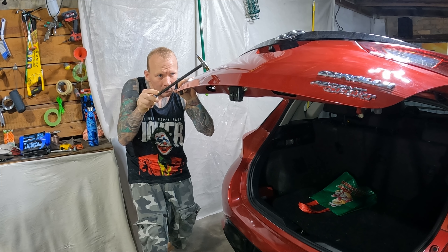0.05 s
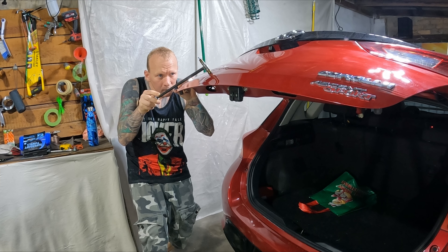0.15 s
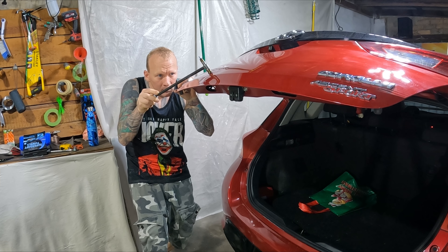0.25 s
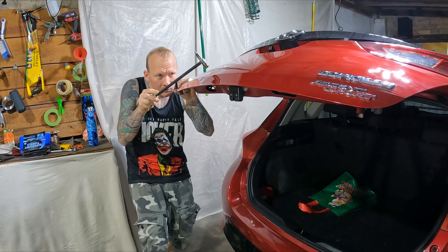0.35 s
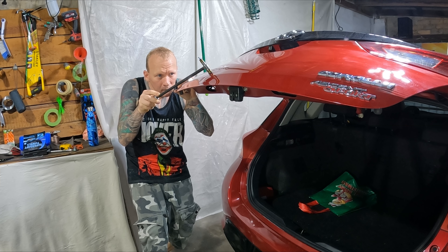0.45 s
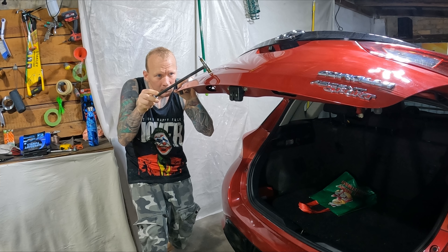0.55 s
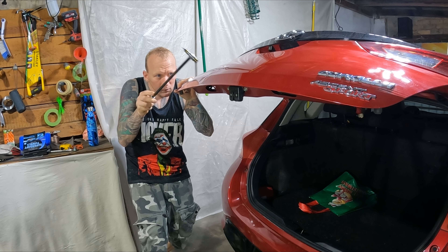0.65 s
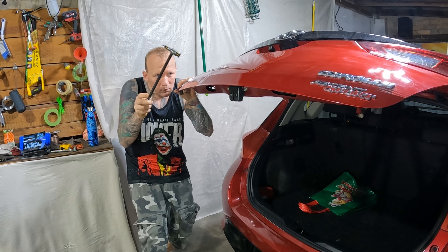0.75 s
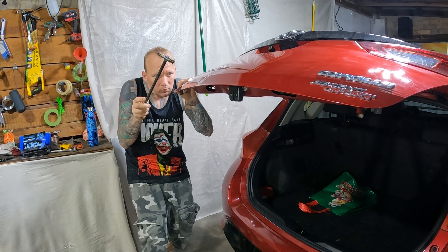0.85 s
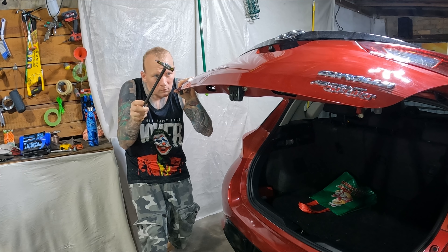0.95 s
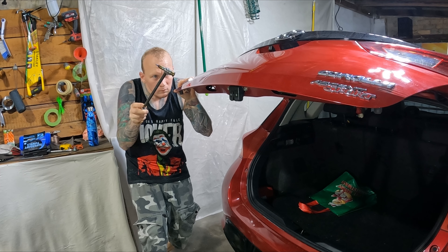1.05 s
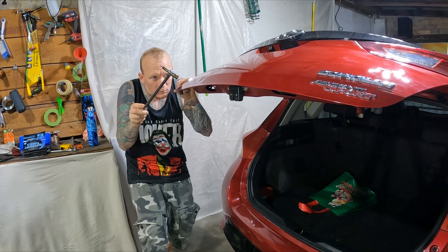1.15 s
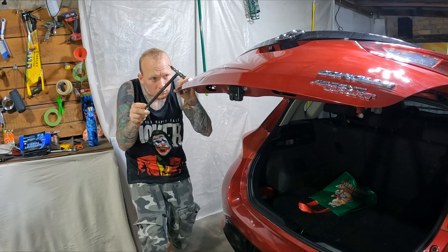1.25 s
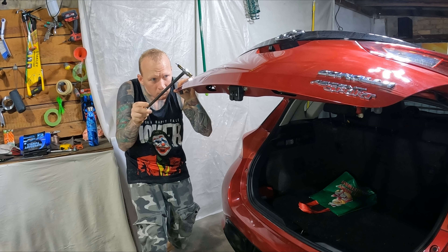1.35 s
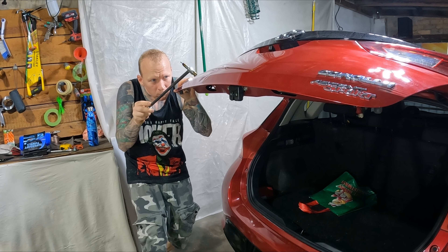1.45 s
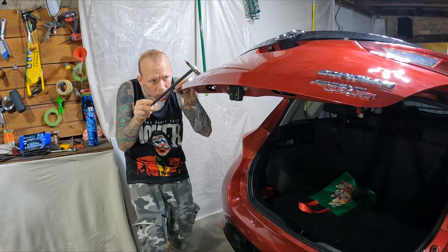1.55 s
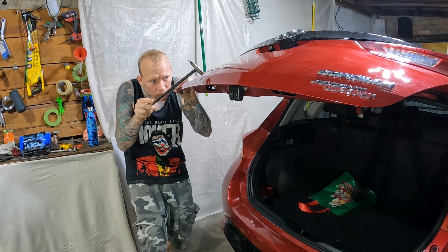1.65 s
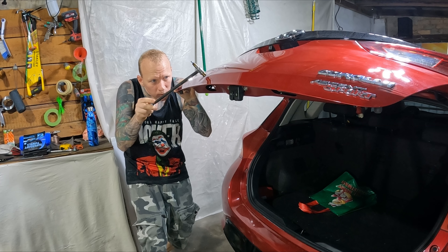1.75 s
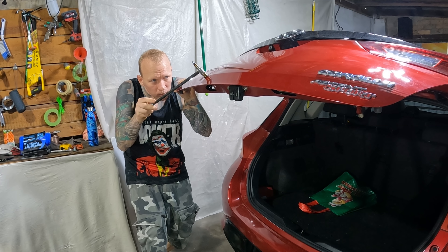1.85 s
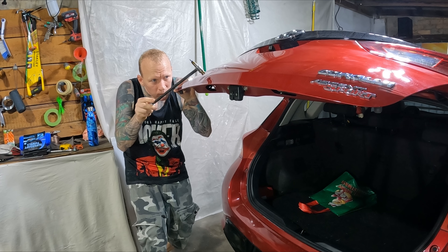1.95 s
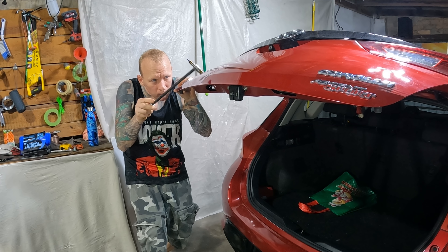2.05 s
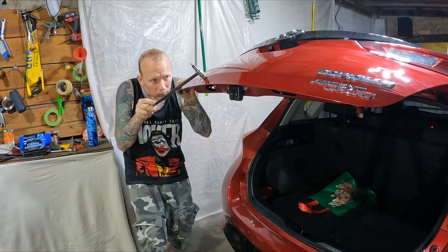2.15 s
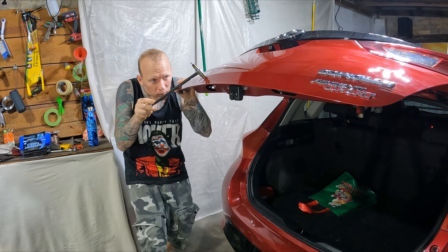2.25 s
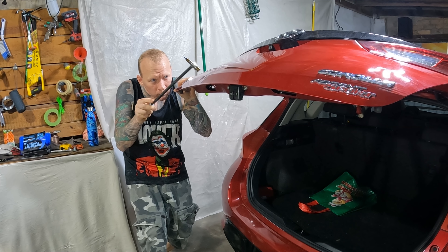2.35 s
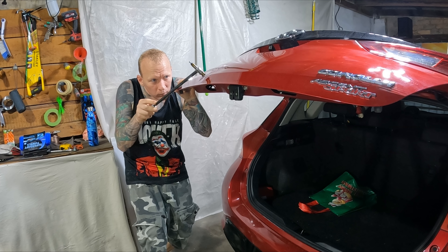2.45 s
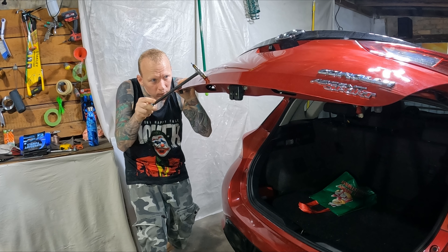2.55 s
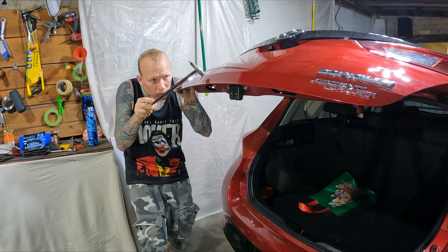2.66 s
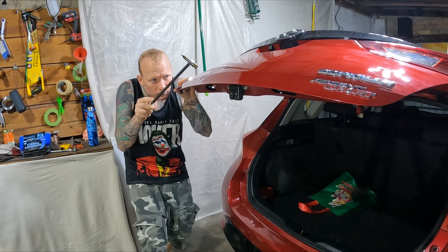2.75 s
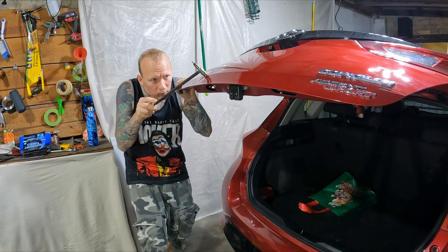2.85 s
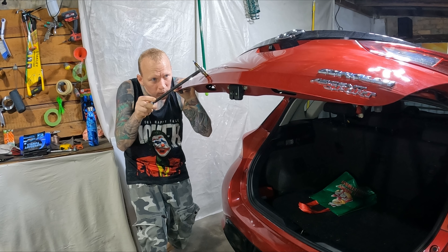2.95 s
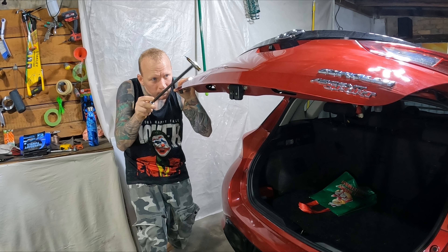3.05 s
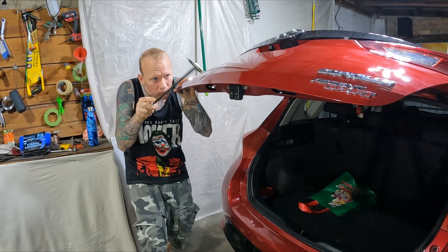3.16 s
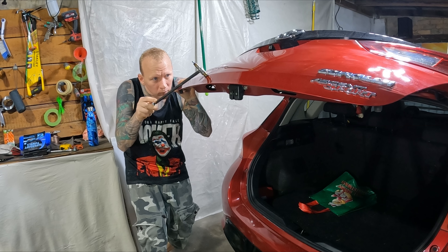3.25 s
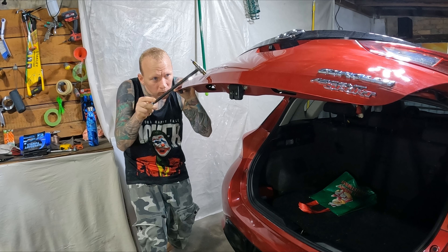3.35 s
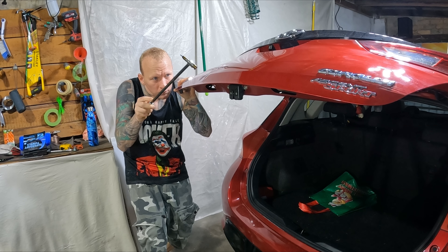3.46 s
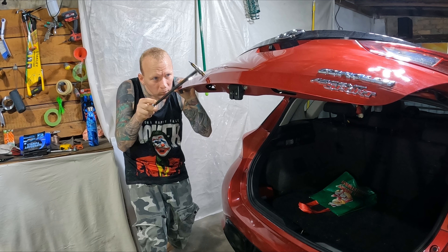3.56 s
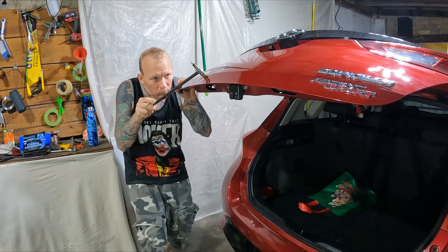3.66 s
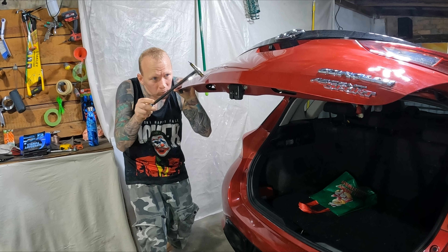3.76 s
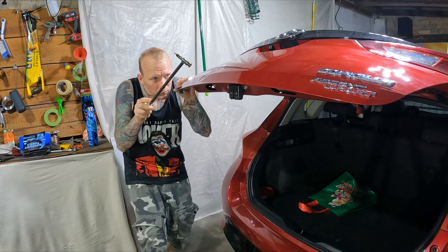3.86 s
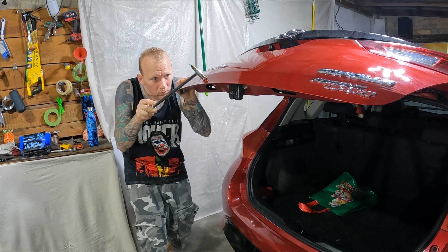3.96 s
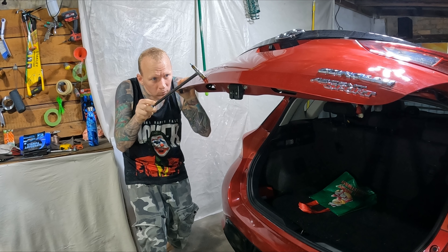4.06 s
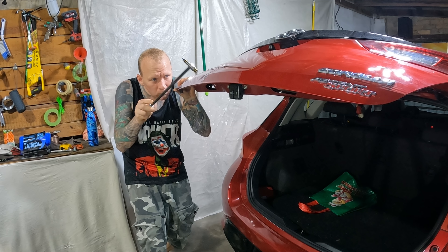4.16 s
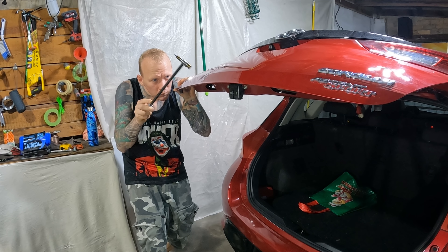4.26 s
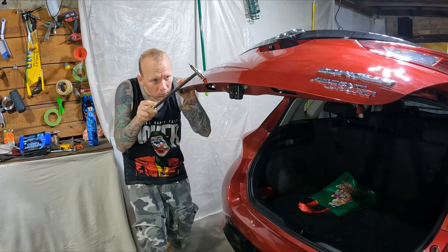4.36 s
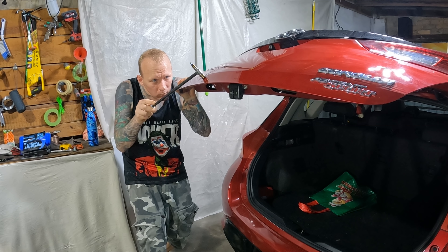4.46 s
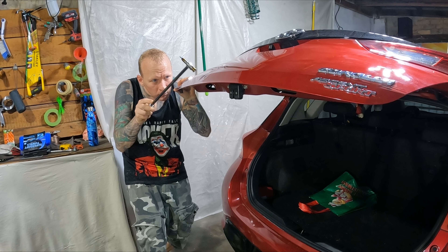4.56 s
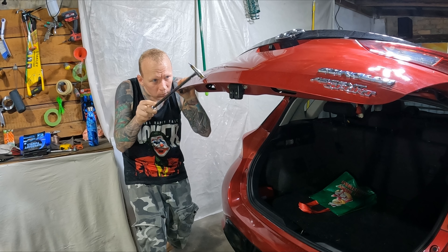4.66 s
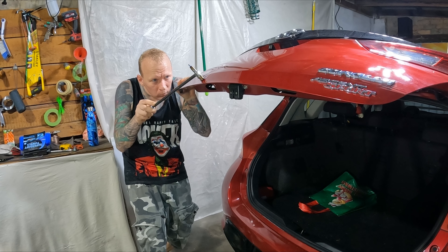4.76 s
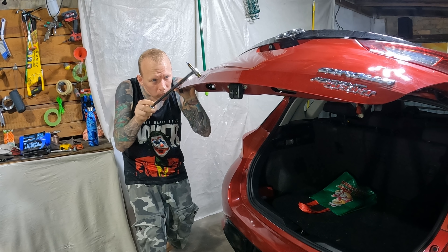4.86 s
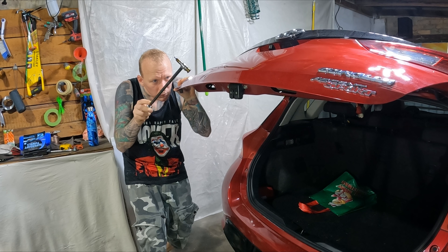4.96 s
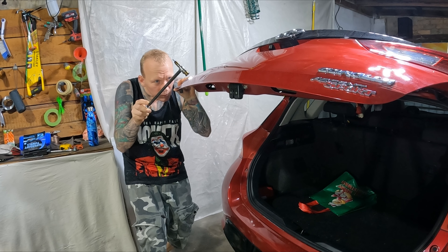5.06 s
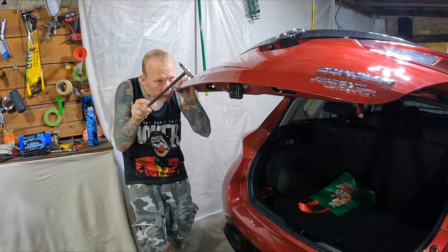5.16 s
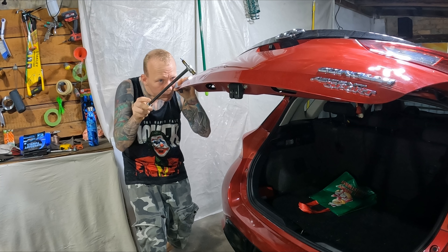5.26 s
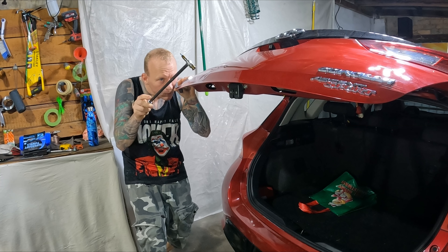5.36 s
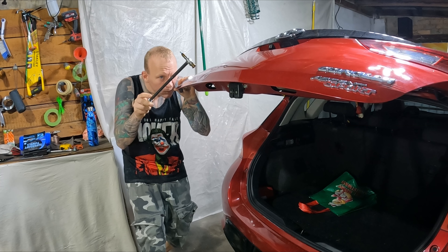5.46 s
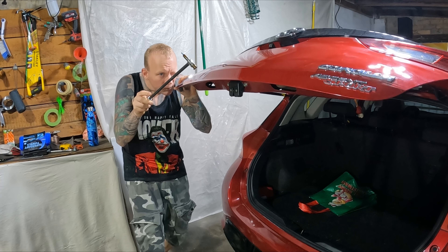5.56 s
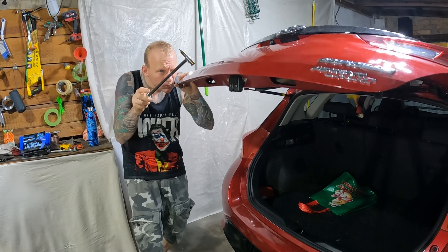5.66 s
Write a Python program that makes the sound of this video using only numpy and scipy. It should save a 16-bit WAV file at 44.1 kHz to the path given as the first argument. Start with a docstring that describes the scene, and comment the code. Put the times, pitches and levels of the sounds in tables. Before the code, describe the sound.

A small metal hammer strikes a car's raised steel tailgate in a garage. The sound opens inside the ring of one tap, two more follow quickly, then there is a pause of over a second with faint hiss and rumble creeping up. Nine more taps follow, starting softly, turning hard, then easing slightly. Each is a sharp knock with a tight wall echo and a brief hollow ring. Stereo microphone in the room, with automatic level control.

```python
"""A light body hammer taps a dent in the raised steel tailgate of a car, in a garage.
First three taps, the earliest caught in its ring; a pause; then nine that start softly, turn hard and ease off.
Each tap is a short knock of the skin under the hammer, its echo off a wall, and the ring of the whole panel,
made of clear modes, crowded modes and a slow sway. A limiter ducks the knocks and lets the ring swell back;
in the pauses a slower gain control lifts a faint hiss and rumble made of coloured noise."""
import sys
import numpy as np
from scipy import signal
from scipy.fft import irfft
from scipy.io import wavfile
from scipy.ndimage import uniform_filter1d

SR = 44100
rng = np.random.default_rng(int(sys.argv[2]) if len(sys.argv) > 2 else 0)


def output_pcm(signal):
    """Save a mono or channel-first signal as 16-bit PCM at the path in sys.argv[1].

    Samples are clipped to [-1, 1] before scaling.
    """
    pcm = np.clip(np.atleast_2d(signal).T, -1, 1) * 32767
    wavfile.write(sys.argv[1], SR, np.round(pcm).astype(np.int16))


N = 251370

# clear modes of the tailgate:
# (frequency [Hz], t60 before hand damping [s], relative level at spot 0 [dB], at spot 1 [dB], at spot 2 [dB])
PANEL_MODES = [(55, 0.9, -34, -30, -31), (97, 0.9, -33, -31, -35), (156, 0.5, -27, -31, -36),
               (203, 0.5, -26, -24, -25), (268, 0.47, -13, -18, -20), (282, 0.47, -22, -25, -15),
               (305, 0.47, -26, -17, -24), (365, 0.47, -14, -19, -24), (407, 0.47, -21, -15, -15),
               (436, 0.6, -10, -16, -20), (471, 0.47, -17, -23, -23), (491, 0.47, -16, -23, -21),
               (507, 0.47, -32, -16, -19), (592, 0.47, -21, -26, -18), (634, 0.47, -19, -17, -13),
               (769, 0.47, -26, -30, -20), (896, 0.47, -18, -23, -33), (922, 0.47, -37, -26, -32),
               (951, 0.47, -20, -18, -23), (996, 0.47, -24, -21, -25), (1035, 0.47, -35, -25, -29),
               (1153, 0.47, -41, -24, -31), (1328, 0.47, -27, -33, -26), (1419, 0.47, -32, -22, -32),
               (1482, 0.47, -31, -19, -36), (1588, 0.45, -34, -26, -33), (1631, 0.45, -27, -26, -31),
               (1728, 0.47, -36, -29, -23), (2238, 0.47, -37, -30, -38), (5825, 0.42, -52, -38, -42)]


def from_db(db):
    """Decibels to gain."""
    return 10 ** (np.asarray(db) / 20)


def at_hz(points, hz):
    """Read a (frequency [Hz], value) table on a log-frequency axis."""
    points = np.array(points)
    return np.interp(np.log(np.maximum(hz, 1)), np.log(points[:, 0]), points[:, 1])


def at_spot(columns, spot):
    """Blend the three spot columns of a table linearly for a place along the dent."""
    weights = np.maximum(0, 1 - abs(np.arange(3) - np.clip(spot, 0, 2)))
    return np.array(columns) @ weights


def add(track, sound, s):
    """Mix a sound in, starting at time s and trimmed to the track."""
    start = round(s * SR)
    first, last = max(start, 0), min(start + sound.shape[-1], N)
    track[:, first:last] += sound[..., first - start:last - start]


def random_modes(size):
    """Random complex strengths of unit power for a mid and a side channel."""
    real, imaginary = rng.standard_normal((2, size)), rng.standard_normal((2, size))
    return (real + 1j * imaginary) / np.sqrt(2)


def spread(strengths, hz):
    """Mid and side strengths to left and right, with a width and a lean that vary with frequency."""
    # stereo width: (frequency [Hz], side minus mid [dB])
    width = [(60, -67.5), (180, -30.5), (350, -18), (700, -11.5), (1400, -8.5), (2800, -6), (6000, -7.5),
             (11000, -6.5), (15000, 1)]
    # stereo lean: (frequency [Hz], left minus right [dB])
    lean = [(400, 0.37), (6000, 1), (10000, 1.5), (14000, 4)]
    mid, side = strengths
    sides = np.array([[1], [-1]])
    stereo = mid + sides * side * from_db(at_hz(width, hz))
    return stereo * from_db(sides * at_hz(lean, hz) / 2)


def tailgate(spread_s=0.0018, garage_s=0.037, garage_share=0.35, contact_s=0.00046):
    """Every tap knocks, echoes off a wall and sets the same panel ringing."""
    # hammer taps: (time [s], force [dB], spot 0-2 along the dent)
    taps = [(-.036, -13.5, 0.31), (.245, -11.5, 0.22), (0.5206, -9.5, 0.25), (1.9022, -15, 0.71),
            (2.2084, -5, 1.21), (2.565, -3.5, 0.97), (2.9202, -2, 1.1), (3.2959, -3.5, 1.09),
            (3.672, -3.5, 0.84), (4.0477, -4, 1.75), (4.4354, -5.5, 1.87), (4.7787, -7, 1.97)]
    ring_s = 0.9
    hand_damping_db_per_s = 20.5   # the hand behind the panel shortens its clear and crowded rings
    follow_through = 0.46   # dB of extra bass per dB of force
    echo_s, echo_db = 0.034, -5   # a wall throws each knock back
    uneven_db = 11   # spread of strength among the treble modes

    t = np.arange(2 * int(ring_s * SR / 2)) / SR
    out = np.zeros((2, N))
    # the panel keeps its mode phases and crowd patterns from tap to tap
    phases = np.exp(2j * np.pi * rng.random((2, len(PANEL_MODES))))
    shapes = np.stack([uneven_modes(len(t) // 2 + 1, uneven_db) for _ in range(3)], axis=-1)

    # bending waves fill the panel at once; the walls' share arrives later
    panel_rise = 1 - np.exp(-t / spread_s)
    garage_rise = 1 - garage_share * np.exp(-(t / garage_s) ** 4)
    envelope = panel_rise * garage_rise * from_db(-hand_damping_db_per_s * t)

    for s, force_db, spot in taps:
        force, weight_db = from_db(force_db), follow_through * force_db
        ring = (clear_ring(spot, phases, t) + crowded_ring(spot, shapes, t)) * envelope
        blow = force * weighted(knock(spot), weight_db)
        add(out, force * weighted(ring, weight_db), s)
        add(out, blow, s + contact_s)
        add(out, from_db(echo_db) * blow, s + contact_s + echo_s)
        add(out, force * sway(), s)
    return out


def knock(spot, scatter_db=2.5):
    """The skin around the contact swells and dies quickly; the low notes mostly swell slowest."""
    # skin under the hammer: (frequency [Hz], time to swell [s],
    # relative peak at spot 0 [dB], at spot 1 [dB], at spot 2 [dB])
    skin_notes = [(197.9, 0.0071, -15.5, -10, -7.5), (414.4, 0.0056, -4, -3, 0),
                  (1069, 0.0027, -19, -5.5, -18.5), (1534, 0.00068, -24.5, -3, -5.5),
                  (2930, 0.00014, -13.5, -26.5, -13), (5765, 0.00074, -24.5, -10, -19),
                  (6140, 0.00014, -20, -9.5, -11.5), (10560, 0.00021, -24, -24, -23.5)]
    t = np.arange(SR // 10) / SR
    out = np.zeros(len(t))
    for k, (hz, swell, *levels) in enumerate(skin_notes):
        gain = from_db(at_spot(levels, spot) + scatter_db * rng.standard_normal())
        envelope = t / swell * np.exp(1 - t / swell)   # reaches 1 at t = swell
        polarity = (-1) ** k
        out += polarity * gain * envelope * np.sin(2 * np.pi * hz * t)
    return out


def clear_ring(spot, phases, t, level_db=4.5, scatter_db=3.5):
    """The tailgate's strong modes, each driven more or less according to the spot that is struck."""
    hz, t60, *levels = np.transpose(PANEL_MODES)
    scatter = scatter_db * rng.standard_normal(len(hz))
    gain = from_db(level_db + at_spot(np.transpose(levels), spot) + scatter)
    poles = 2j * np.pi * hz - np.log(1000) / t60   # each mode turns and decays exponentially
    return np.real((gain * spread(phases, hz)) @ np.exp(poles[:, None] * t))


def crowded_ring(spot, shapes, t, level_db=0.5, change=0.055):
    """Modes too close to tell apart: alike for taps on one spot, a little changed each time, dying band by band."""
    # crowded modes of panel and garage:
    # (frequency [Hz], relative density at spot 0 [dB per Hz], at spot 1 [dB per Hz], at spot 2 [dB per Hz])
    crowd = np.array([(75.6, -54, -39.5, -37), (134, -36.5, -46.5, -40), (191, -42, -35, -35.5),
                      (314, -38, -37, -33.5), (447, -41.5, -31.5, -36.5), (487.5, -36.5, -30, -27),
                      (645, -36.5, -42, -37), (994, -41, -34.5, -38), (1435, -45, -42.5, -40),
                      (2030, -53, -44.5, -46.5), (3730, -57, -52.5, -53), (6600, -62.5, -57, -56.5),
                      (8800, -74, -68, -67), (11600, -74, -67, -66.5), (15900, -112.0, -87.5, -81.5)])
    # their decay: (frequency [Hz], t60 before hand damping [s])
    crowd_decay = [(100, 0.62), (400, 0.53), (1200, 0.49), (3000, 0.52), (6000, 0.44), (12000, 0.32)]
    hz = np.arange(len(t) // 2 + 1) * SR / len(t)

    # blend neighbouring spots at constant power, then renew a share of the pattern
    pattern = at_spot(shapes, spot) / np.linalg.norm(at_spot(np.eye(3), spot))
    strengths = np.sqrt(1 - change) * pattern + np.sqrt(change) * random_modes(len(hz))

    levels = np.c_[crowd[:, 0], at_spot(crowd[:, 1:], spot)]
    bass_cut = hz ** 2 / (hz ** 2 + 40 ** 2)
    colour = from_db(level_db + at_hz(levels, hz)) * bass_cut
    spectrum = spread(strengths, hz) * colour * np.sqrt(SR * len(t) / 2)

    # overlapping bands that sum to one, each with its own decay
    centres, t60s = np.transpose(crowd_decay)
    bands = [at_hz(np.c_[centres, one], hz) for one in np.eye(len(centres))]
    return sum(irfft(spectrum * band) * np.exp(-np.log(1000) * t / t60) for band, t60 in zip(bands, t60s))


def uneven_modes(size, uneven_db, ripple_db=4.0):
    """Random-phase mid and side modes; above the low mids some radiate more than the rest, in clusters."""
    hz = np.arange(size) * SR / 2 / (size - 1)
    high = hz ** 2 / (hz ** 2 + 1000 ** 2)
    cluster = uniform_filter1d(uniform_filter1d(rng.standard_normal(size), size=60), size=60)
    ripple = ripple_db * np.tanh(cluster / np.std(cluster))
    scatter = uneven_db * np.clip(rng.standard_normal(size), -2, 2)
    sizes = from_db(high * (scatter + ripple))
    local_rms = np.sqrt(uniform_filter1d(sizes ** 2, size=400))   # keeps the broad colour flat
    return np.exp(2j * np.pi * rng.random((2, size))) * sizes / local_rms


def weighted(sound, weight_db, corner_hz=440.0):
    """A hammer that follows through pushes the panel longer and draws more of its low notes."""
    low = signal.lfilter(*signal.butter(1, corner_hz, fs=SR), sound)
    return sound + (from_db(weight_db) - 1) * low


def sway(rise_s=0.03):
    """The whole tailgate shudders slowly on its struts after a tap: one low, decaying sine."""
    hz, t60_s, level_db = 29.68, 2.12, -40.5   # level for a tap of 0 dB force
    t = np.arange(2 * SR) / SR
    envelope = from_db(level_db - 60 * t / t60_s) * (1 - np.exp(-t / rise_s))
    return envelope * np.sin(2 * np.pi * (hz * t + rng.random()))


def background(spectrum, level_db):
    """Smooth, steady stereo noise of a given colour, set to an RMS level."""
    hz = np.arange(N // 2 + 1) * SR / N
    noise = irfft(spread(random_modes(len(hz)), hz) * from_db(at_hz(spectrum, hz)), N)
    return noise / np.std(noise) * from_db(level_db)


def scene():
    """The tailgate over the garage's hiss and rumble."""
    # room hiss: (frequency [Hz], relative density [dB per Hz])
    hiss = [(100, 1.5), (200, -1), (300, -10.5), (450, -11.5), (800, -9), (1300, -3), (1900, -6.5),
            (3000, -15.5), (4500, -22), (7000, -25.5), (9000, -39), (12000, -50), (16000, -87.5)]
    # low rumble: (frequency [Hz], relative density [dB per Hz])
    rumble = [(12, -6), (28, 1.5), (50, 2.5), (75, -7), (120, -42), (180, -25.5), (300, -47)]
    # noise levels ahead of the gain control
    return tailgate() + background(hiss, level_db=-64.5) + background(rumble, level_db=-66.5)


def duck(x, threshold_db, share, release_db_per_s, window_s):
    """Looks a little ahead, takes away a share of the level above the threshold and recovers at a steady rate."""
    size, t = int(window_s * SR), np.arange(N) / SR
    power = uniform_filter1d(np.mean(x ** 2, axis=0), size)
    level_db = 10 * np.log10(np.maximum(power, 1e-12))
    over_db = share * np.maximum(level_db - threshold_db, 0)
    # a running maximum on a tilted axis gives a straight release in dB
    release_db = release_db_per_s * t
    duck_db = np.maximum.accumulate(over_db + release_db) - release_db
    return x * from_db(-uniform_filter1d(duck_db, size // 2))


def record(dry, make_up_db=12.0):
    """A slow gain control lets the hiss creep up in the pauses, a fast limiter holds the knocks, then the top is cut."""
    levelled = duck(dry, threshold_db=-36.0, share=0.4, release_db_per_s=8.0, window_s=0.0058)
    levelled = from_db(make_up_db) * levelled
    limited = duck(levelled, threshold_db=-12.5, share=0.97, release_db_per_s=63.5, window_s=0.00596)
    top_cut = signal.cheby2(14, 60, 16500, fs=SR, output="sos")   # 60 dB down from 16.5 kHz
    return signal.sosfilt(top_cut, np.clip(limited, -1, 1))


dry = scene()
out = record(dry)
output_pcm(out)
```